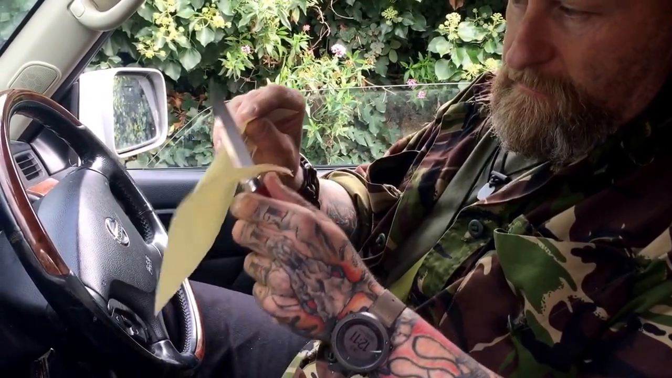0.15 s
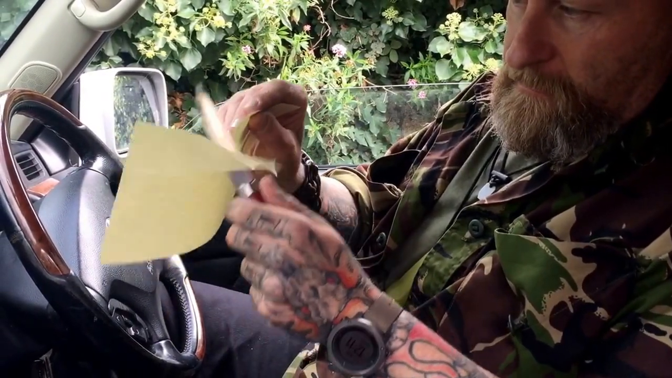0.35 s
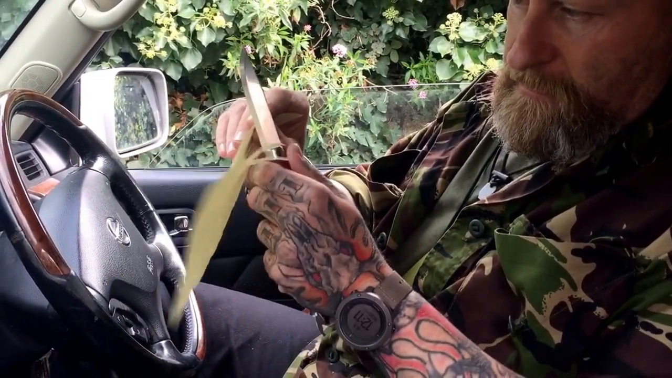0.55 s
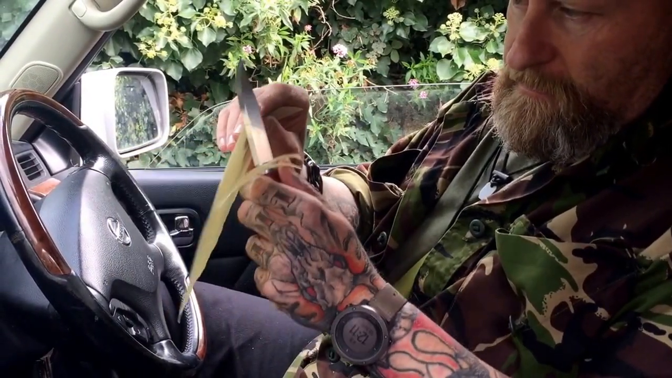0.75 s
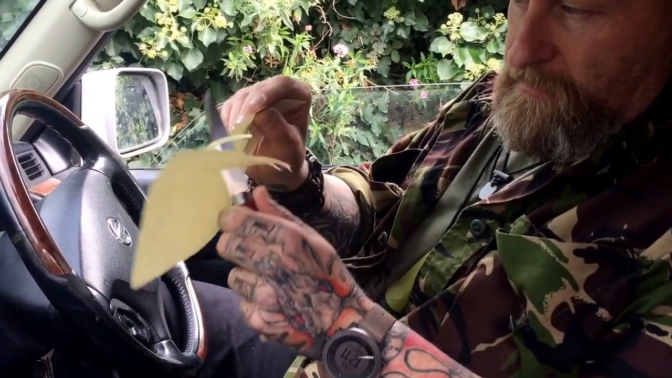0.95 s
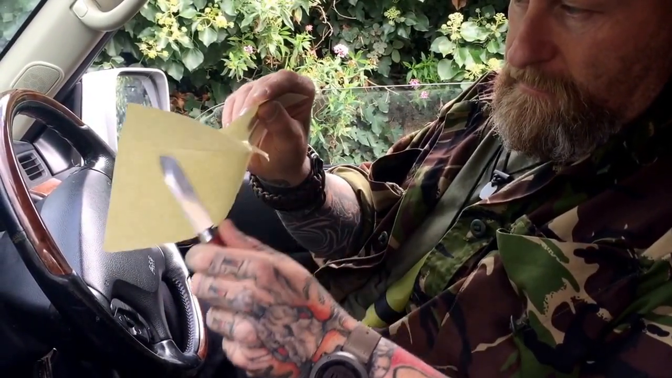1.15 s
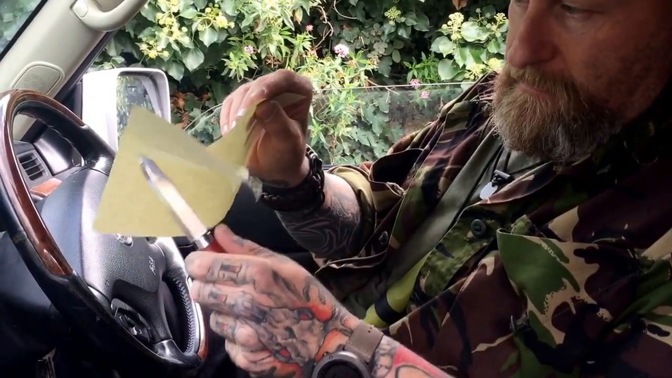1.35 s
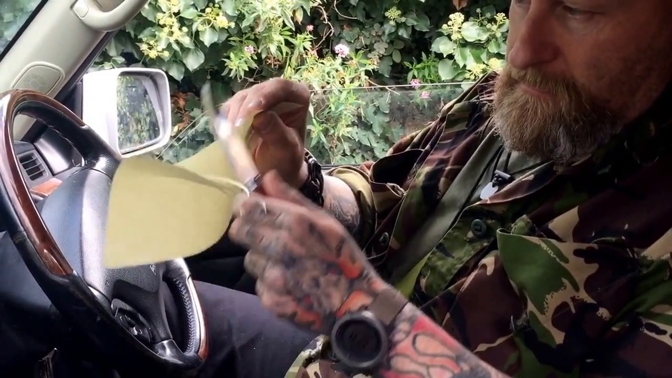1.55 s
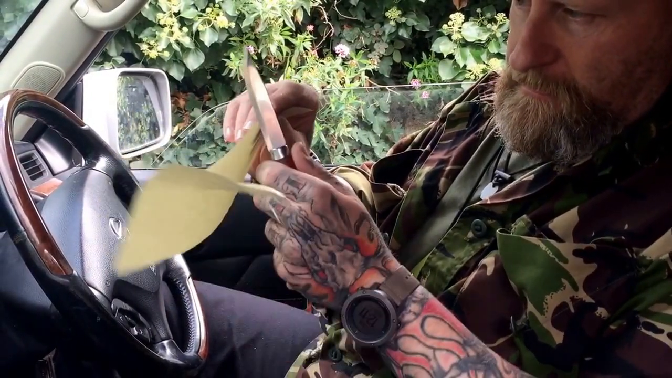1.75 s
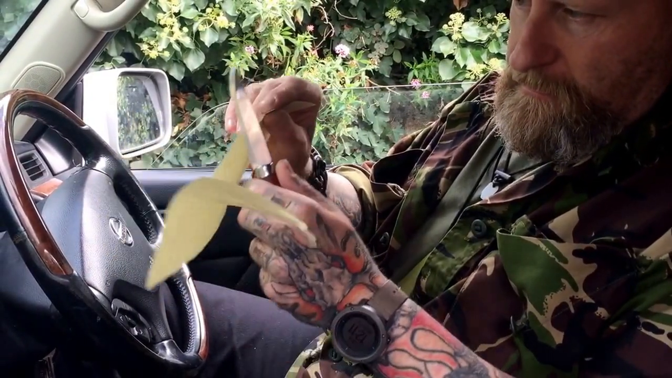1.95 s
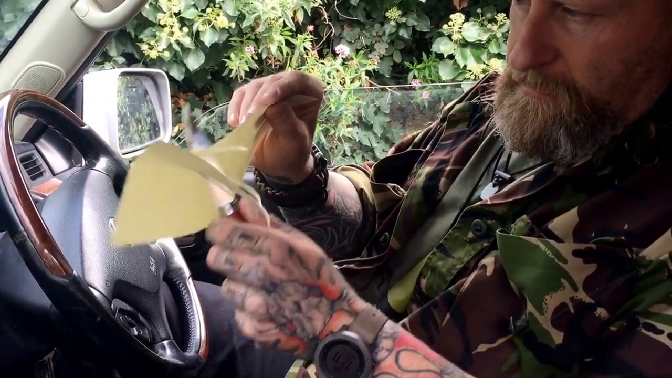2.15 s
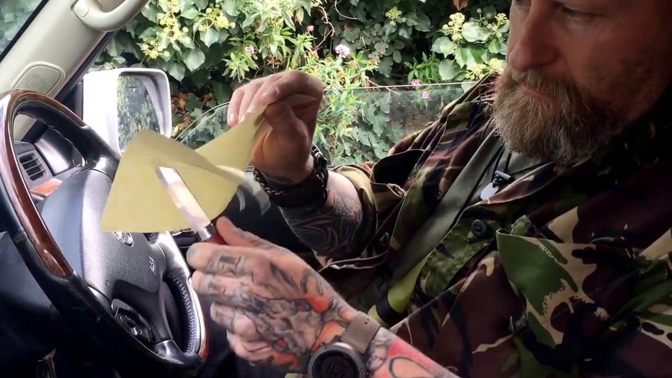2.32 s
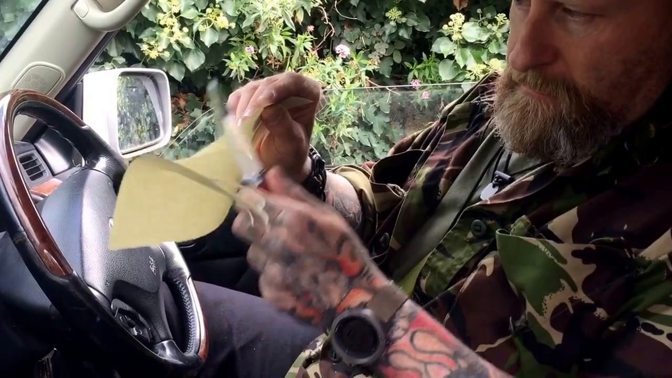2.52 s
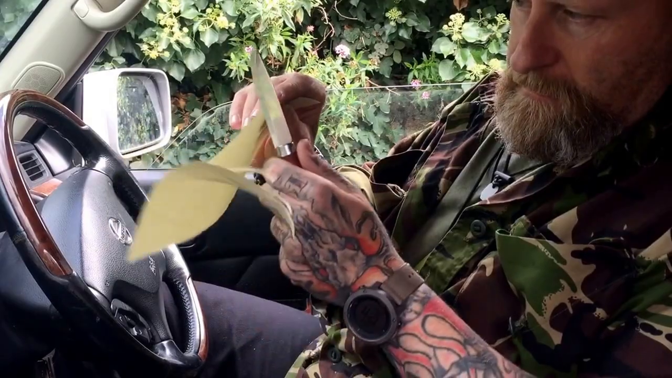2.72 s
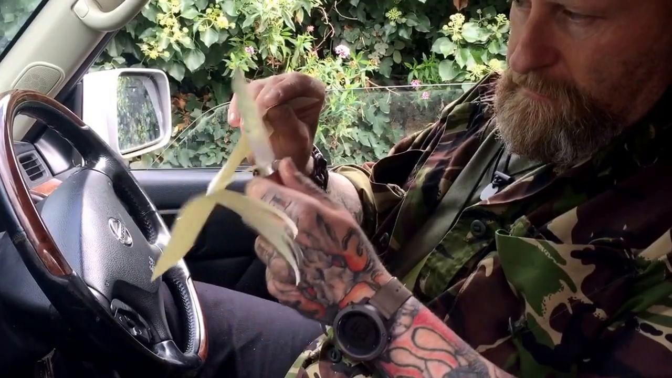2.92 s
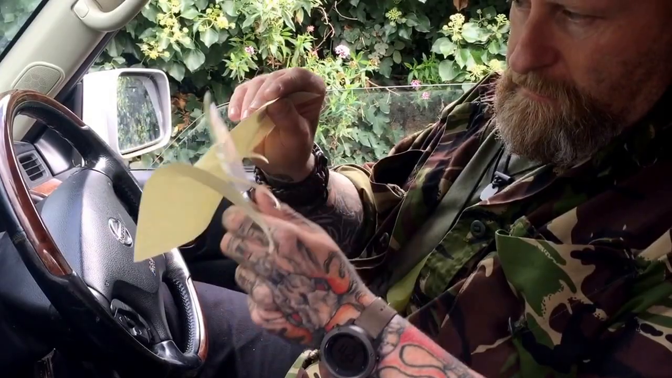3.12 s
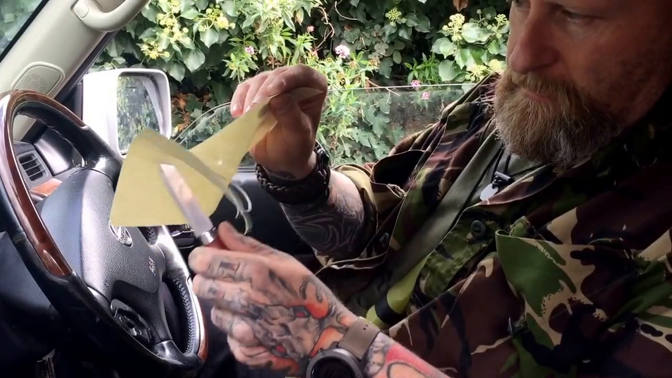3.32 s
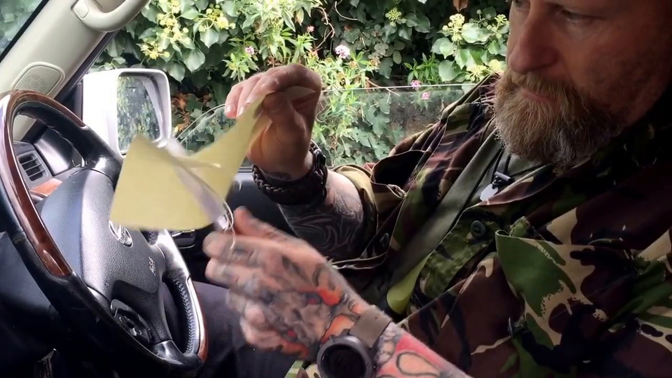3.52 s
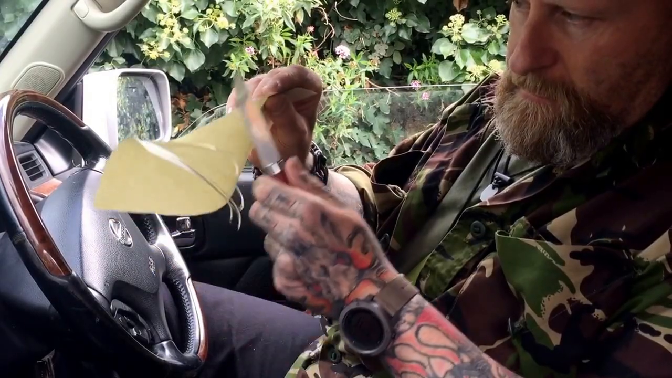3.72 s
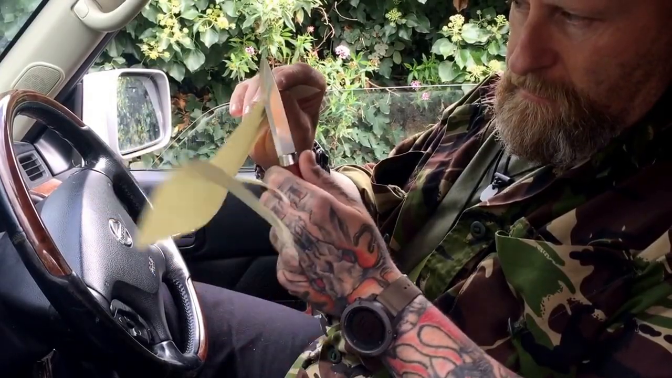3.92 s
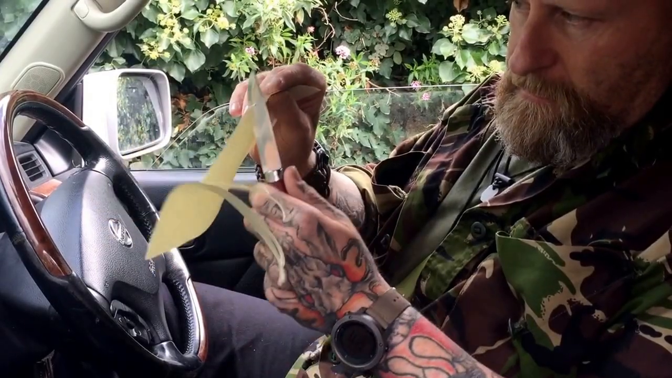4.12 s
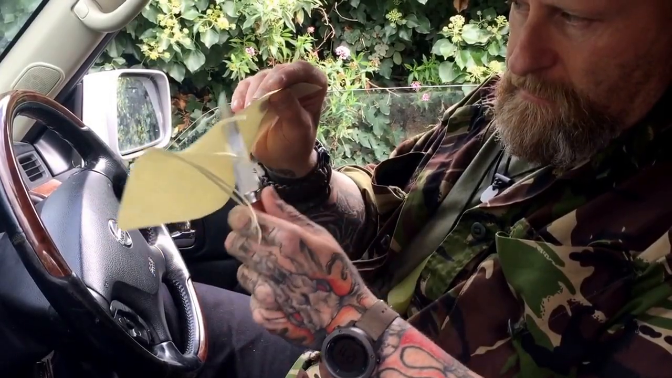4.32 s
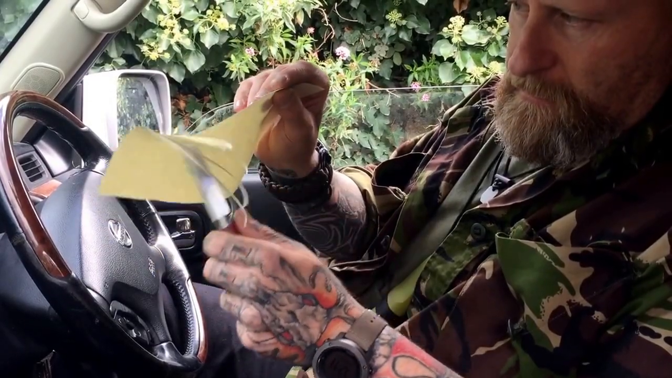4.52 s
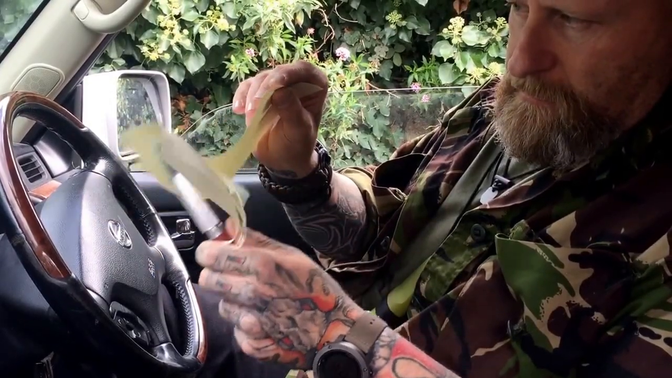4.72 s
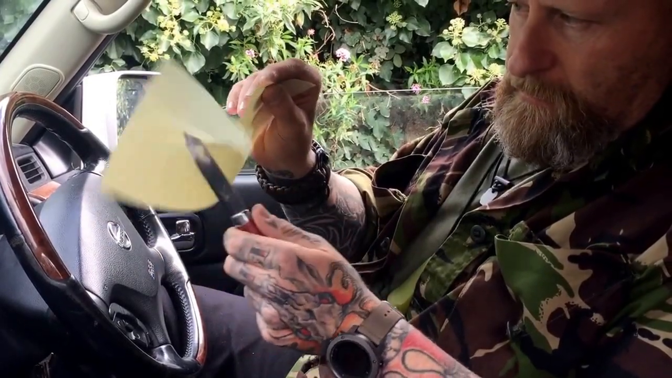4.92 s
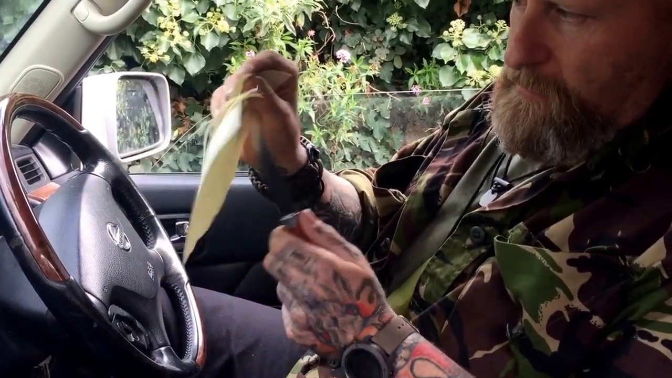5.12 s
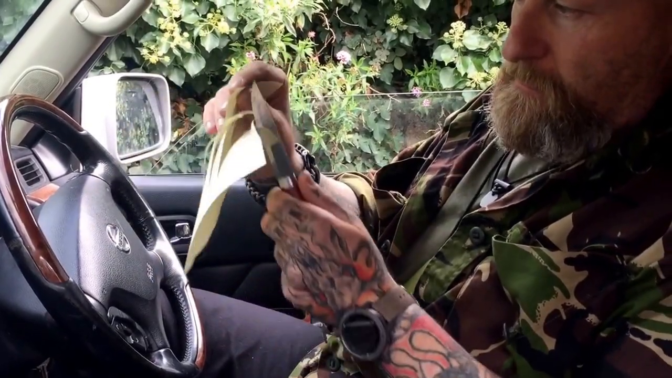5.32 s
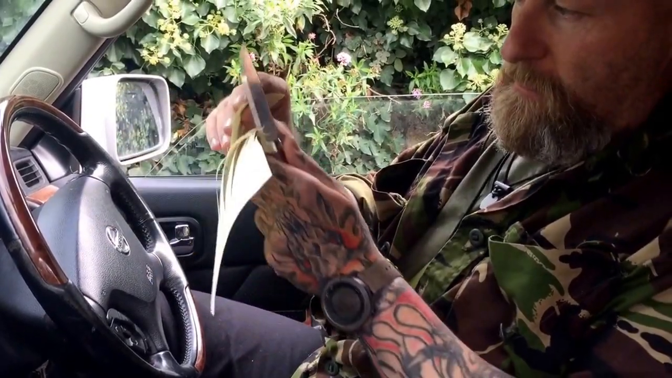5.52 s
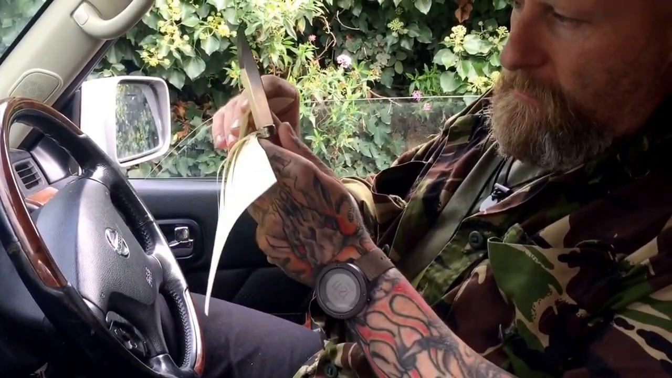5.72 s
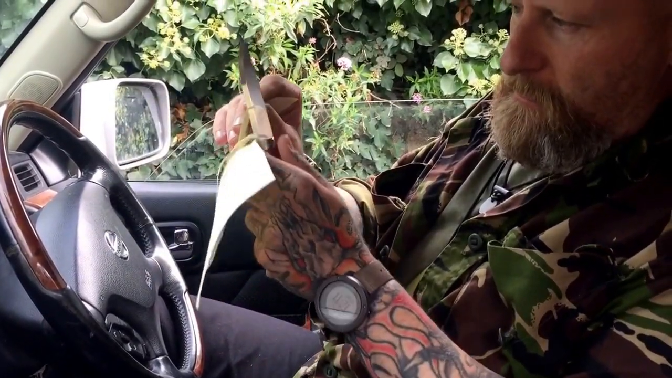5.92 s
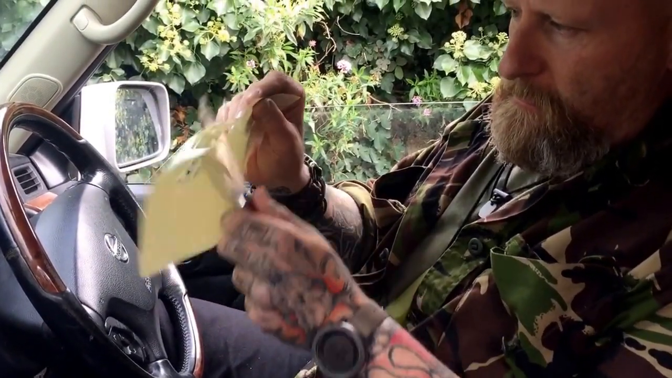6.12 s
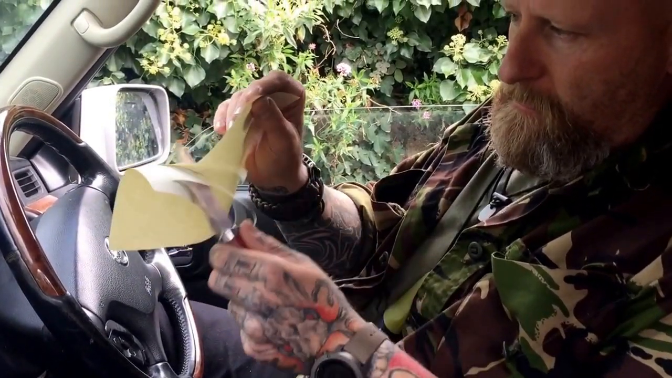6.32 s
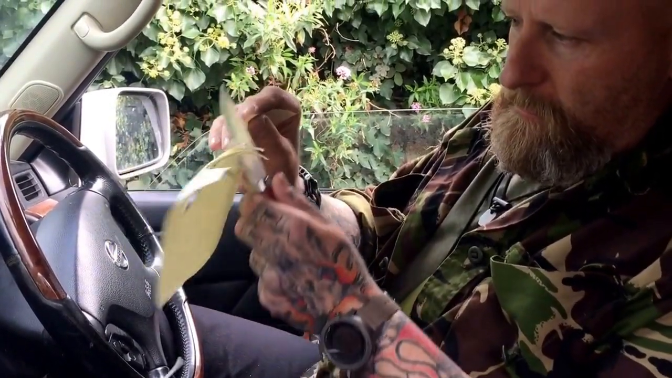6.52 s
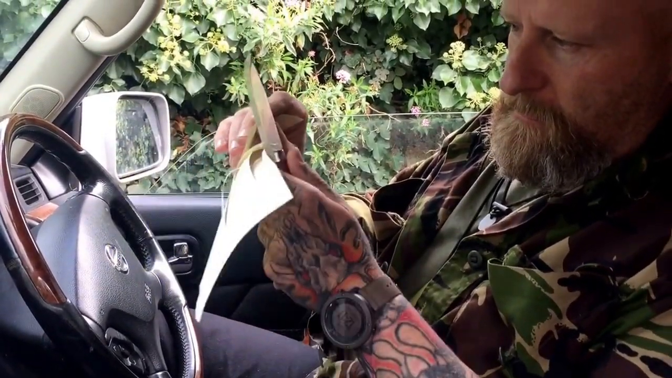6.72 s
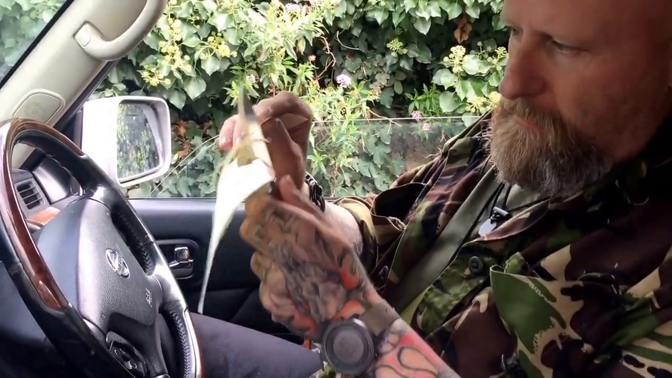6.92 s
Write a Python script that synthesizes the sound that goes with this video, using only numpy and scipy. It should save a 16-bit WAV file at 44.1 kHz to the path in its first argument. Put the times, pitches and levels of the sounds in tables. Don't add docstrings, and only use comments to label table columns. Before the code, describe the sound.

Close, dry sound of a keen blade cutting a loose paper sheet in a parked car. Four full strokes, each about half a second, swell from thin hiss to fuller papery rip, roughly a second apart. Small brushes, knocks and finger ticks fill the gaps; a long shallow nick and a faint one follow over a soft hush.

```python
import sys
import numpy as np
from scipy import signal
from scipy.fft import rfft, irfft
from scipy.io import wavfile
from scipy.ndimage import uniform_filter1d

SR = 44100
rng = np.random.default_rng(int(sys.argv[2]) if len(sys.argv) > 2 else 0)


def nominal_scale(level):
    x = np.asarray(level, float) / 20
    return 10 ** x


def transcribe(signal):
    frames = np.atleast_2d(signal).T
    limited = np.clip(frames, -1, 1)
    pcm = np.round(limited * 32767).astype(np.int16)
    wavfile.write(sys.argv[1], SR, pcm)


N = 306936


def cut():
    # [f/Hz, level/dB per Hz]
    rasp_spectrum = [(1100, -35.5), (1800, -25), (2700, 2), (4300, 3), (6000, -4.5), (8500, -3.5),
                     (11000, -39.5), (16000, -65)]
    flap_spectrum = [(350, -28), (600, -18), (794, -4), (980, 4.5), (1080, -2.5), (1530, 5.5), (1800, 8.5),
                     (3200, -6.5), (4160, -15), (7040, -120)]
    belly_spectrum = [(65, -48), (110, -32), (172, 5.5), (270, -11), (367, -1), (408, -7.5), (511, -0.5),
                      (608, -5), (800, -14), (1040, -4), (1760, -120)]
    fizz_spectrum = [(3530, -90), (6000, -4), (7200, -2.5), (9600, 1), (10400, -4.5), (11800, -1),
                     (15200, -7), (16200, -9), (16500, -60)]
    snaps = fibres()
    rasp = evened(shaped(snaps, rasp_spectrum))
    flap = evened(shaped(snaps, flap_spectrum))
    belly = evened(shaped(snaps, belly_spectrum))
    fizz = evened(shaped(snaps, fizz_spectrum))
    opened, note_hz = openings()
    note = resonate(rasp, note_hz, width_hz=600)
    rasp = evened(rasp + nominal_scale(4) * note)
    flap_low = colour(flap, lambda hz: 1 / (1 + (hz / 1350) ** 8))
    freed = np.clip(nominal_scale(26.5) * opened[2] / (opened[1] + 1e-9), 0.08, 1)
    flap = flap - (1 - freed) * flap_low
    return (opened * [rasp, flap, belly, fizz]).sum(0)


def fibres(per_s=9500, spread_db=2.3, chatter_db=0.9):
    snaps = rng.choice([-1., 1.], N) * (rng.random(N) < per_s / SR)
    snaps *= nominal_scale(spread_db * np.minimum(rng.exponential(1, N), 5))
    chatter = evened(uniform_filter1d(rng.standard_normal(N), size=260))
    return mottle(snaps * nominal_scale(chatter_db * chatter), depth_db=2.5, size=512, bins=2, frames=20)


def openings():
    flap_range_db, belly_range_db, belly_late = (-12.5, 3.5), (-45, -13), 1.67
    fizz_depth_db, fizz_knee_db, fizz_loss = 2, -38.5, 1
    note_wander, note_wander_s = 0.04, 0.052
    t = np.arange(N) / SR
    power = np.full((4, N), 1e-18)
    tuned = np.zeros(N)
    for rows, notes_hz, fizz_db, flap_db in contacts():
        s, press_db, depth = np.transpose(rows)
        on = slice(max(round(s[0] * SR), 0), max(round(s[-1] * SR), 0))
        press_db = np.interp(t[on], s, press_db)
        depth = np.clip(np.interp(t[on], s, depth), 0, 1.3)
        parts_db = [0 * depth,
                    flap_db + flap_range_db[0] + np.diff(flap_range_db) * depth,
                    flap_db + belly_range_db[0] + np.diff(belly_range_db) * depth ** belly_late,
                    fizz_db + fizz_depth_db * depth - fizz_loss * np.maximum(press_db - fizz_knee_db, 0)]
        power[:, on] += nominal_scale(press_db + parts_db) ** 2
        glide_hz = np.interp(t[on], np.linspace(s[0], s[-1], len(notes_hz)), notes_hz)
        tuned[on] += nominal_scale(press_db) ** 2 * glide_hz
    note_hz = (tuned / power[0]).clip(2500, 8000)
    note_hz = note_hz * (1 + note_wander * wander(note_wander_s))
    return uniform_filter1d(np.sqrt(power), size=130, axis=1), note_hz


def contacts():
    # [t/s, blade pressure level/dB, depth of the freed flap 0-1]
    cuts = [
        [(0.652, -70, 1), (0.682, -46, 0.37), (0.862, -47.5, 0.19), (0.97, -43, 0.48), (1.008, -39.5, 0.57),
         (1.074, -40.5, 0.84), (1.224, -39, 0.91), (1.3, -43, 0.93), (1.345, -71, .99)],
        [(1.79, -85, 1), (1.816, -59, .3), (1.874, -49, 0.7), (1.91, -48.5, 0.15), (2.142, -38, 0.45),
         (2.2, -39.5, 0.76), (2.33, -37, 0.81), (2.39, -88, 0.94)],
        [(2.915, -58, 0.6), (2.925, -41.5, 0.64), (2.991, -44, 0.51), (3.025, -43.5, 0.35),
         (3.187, -37.5, 0.31), (3.257, -36.5, 0.75), (3.319, -35.5, 0.81), (3.4, -37.5, 0.87), (3.45, -69, 1)],
        [(4.09, -62, 0.77), (4.126, -45.5, 0.4), (4.2, -49, 0.55), (4.246, -44, 0.43), (4.388, -35.5, 0.28),
         (4.48, -39, 0.79), (4.59, -40, 0.89), (4.656, -43, 0.91), (4.71, -77, .9)],
    ]
    nicks = [
        [(0.0, -46.5, 0.45), (0.064, -42, 0.01), (0.125, -46.5, 0.2), (0.145, -52.5, 0.5), (0.155, -60, 0)],
        [(5.845, -90, .2), (5.852, -60, 0), (5.976, -47.5, 0.1), (6.118, -43.5, 0.33), (6.17, -46.5, 0.62),
         (6.225, -61.5, 0.3), (6.245, -58.5, .5), (6.312, -65, 0.33), (6.33, -87, 0.5)],
        [(6.79, -76, 0), (6.81, -52.5, 0), (6.84, -51, 0.01), (6.902, -49, 0.2), (6.97, -47, 0.3)],
    ]
    # [start f/Hz, middle f/Hz, end f/Hz, fizz level/dB, flap level/dB]
    strips = [
        (4500, 4300, 4250, -0.5, -1.26),
        (4000, 4670, 3670, -1.5, -.3),
        (4300, 3870, 5900, -2.5, -0.6),
        (4100, 3620, 5900, -2.5, -0.2),
        (4500, 4600, 4800, -4.5, -9.5),
        (4300, 5000, 2400, 1.5, 1.5),
        (4600, 4900, 4200, 2.2, 2),
    ]
    # [start t/s, length t/s, first level/dB, last level/dB, strip note f/Hz]
    brushes = [(0.157, .095, -60.5, -63.5, 4000), (0.246, 0.016, -60, -43.5, 3700),
               (0.293, .05, -60, -71, 3960), (0.354, 0.019, -56, -84, 5200), (0.412, 0.021, -70, -70, 4000),
               (2.532, 0.067, -73, -65.5, 3600), (2.859, 0.046, -61, -53.5, 3530),
               (3.645, 0.14, -74, -70, 4500), (3.742, 0.051, -60.5, -56.5, 4640),
               (3.8, 0.06, -76, -68.5, 4300), (1.5, 0.035, -84, -66.5, 4000),
               (3.971, 0.037, -70, -62, 3700), (4.016, .012, -65, -49, 3800),
               (4.044, 0.046, -44.5, -62, 4150), (5.075, .045, -61, -74, 5250),
               (5.244, .012, -70, -64, 4200), (5.31, 0.35, -67.5, -71.5, 5040),
               (5.72, 0.018, -70, -80, 3850), (6.351, 0.056, -61.5, -80, 3520),
               (6.404, 0.083, -78, -69, 4600), (6.51, 0.039, -61, -78, 4000), (6.56, 0.19, -68, -76, 4100),
               (6.325, .025, -75, -77, 3500), (3.487, 0.087, -78, -86, 4000)]
    skids = [
        (1.608, 0.047, -36, -41.5, 4000),
        (2.762, 0.056, -60.5, -50, 3380),
        (4.753, 0.02, -51, -48, 4100),
        (4.794, 0.16, -59.5, -50, 5060),
    ]
    strokes = [(rows, notes_hz, fizz_db, flap_db)
               for rows, (*notes_hz, fizz_db, flap_db) in zip([*cuts, *nicks], strips)]
    slips = [(touch(*row, edges_s=(0.002, 0.016), depth=0.33), [hz], -3.5, 0) for *row, hz in brushes]
    false_starts = [(touch(*row, edges_s=(0.031, 0.031), depth=0.094), [hz], -1, 0) for *row, hz in skids]
    return strokes + slips + false_starts


def touch(start, length, first_db, last_db, edges_s, depth, edge_db=-28):
    end = start + length
    return [(start - edges_s[0], first_db + edge_db, depth),
            (start, first_db, depth),
            (end, last_db, depth),
            (end + edges_s[1], last_db + edge_db, depth)]


def taps():
    # [t/s, peak level/dB, colour f/Hz, thump level/dB, rattle t/s]
    knocks = [
        (0.259, -25.5, 2110, -28.5, 0.018),
        (1.868, -26, 2230, -21.5, 0.0016),
        (2.785, -38, 1950, -20, 0.027),
        (2.901, -21, 1830, -31.5, 0.0042),
        (3.465, -26.5, 1610, -33, 0.0046),
        (4.035, -26, 1700, -29.5, 0.0058),
        (6.616, -44.5, 1560, -45, 0.0078),
    ]
    slaps = [
        (4.74, -31, 1725, -19.5, 0.015),
        (6.147, -31.5, 1310, -20.5, 0.0042),
    ]
    # [t/s, peak level/dB, colour f/Hz, fizz level/dB]
    ticks = [(0.313, -38.5, 3700, -26), (0.355, -45.5, 2100, -33), (0.409, -49, 3420, -19),
             (1.594, -40, 3700, -10), (2.533, -54, 7160, -13), (2.583, -46.5, 2900, -22),
             (2.764, -41.5, 2400, -21), (1.535, -57, 4000, -10), (2.871, -59, 3680, -6),
             (3.602, -53.5, 2170, -25), (3.661, -46, 4280, -10), (3.711, -47, 4300, -11),
             (3.754, -36, 4300, -8), (4.115, -34, 3550, -2), (4.715, -41, 3330, -28),
             (4.803, -44.5, 1700, -21), (5.024, -50, 6400, -12), (5.076, -45, 7700, -16),
             (5.257, -39, 4140, -40), (5.322, -46.5, 4100, -7), (5.721, -56, 3360, -21),
             (6.237, -34.5, 3230, -8.5), (6.349, -62, 3800, -22), (6.497, -37, 2330, -7),
             (6.298, -36, 3030, -21)]
    knock_thump_hz, slap_thump_hz, knock_fizz_db = 456, 192, -20.5
    tick_thump_db, tick_rattle_s = -33.5, 0.0079
    rows = [(s, db, hz, thump_db, knock_thump_hz, knock_fizz_db, rattle_s)
            for s, db, hz, thump_db, rattle_s in knocks]
    rows += [(s, db, hz, thump_db, slap_thump_hz, knock_fizz_db, rattle_s)
             for s, db, hz, thump_db, rattle_s in slaps]
    rows += [(s, db, hz, tick_thump_db, slap_thump_hz, fizz_db, tick_rattle_s)
             for s, db, hz, fizz_db in ticks]
    out = np.zeros(N + 4096)
    for s, *how in rows:
        out[round(s * SR):][:4096] += tap(*how, rng.standard_normal(2048))
    return out[:N]


def tap(db, hz, thump_db, thump_hz, fizz_db, rattle_s, noise):
    t = np.arange(len(noise)) / SR
    burst = noise * np.exp(-t / max(rattle_s, 0.0005)) * (1 - np.exp(-t / 0.00076))
    burst[8] += 2.6
    f = np.fft.rfftfreq(4096, 1 / SR)
    notes = nominal_scale(6) * (ring(f, hz, 11) - 0.6 * ring(f, 1.85 * hz, 11))
    body = nominal_scale(4) * ring(f, 0.94 * hz, 0.58) ** 2
    thump = nominal_scale(thump_db + 25.5) * ring(f, thump_hz, 1.26)
    fizz = nominal_scale(fizz_db + 16.5) * ring(f, 6720, 4.3) ** 2
    sound = irfft(rfft(burst, 4096) * (notes + body + thump + fizz))
    return nominal_scale(db - 2) * sound / abs(sound).max()


def cabin(x, modes_db=8, tail_db=-5):
    # [f/Hz, width f/Hz, level/dB]
    standing_waves = [(199, 72, -28), (510, 190, -2), (870, 23, -7), (1128, 53, -2), (1343, 91, -5),
                      (1540, 73, -2), (1700, 56, -4.5), (2184, 17, -9), (2480, 110, -8.5), (2746, 18, -15),
                      (3146, 33, -12), (4180, 19, -8.5), (3664, 36, -10), (5645, 26, 3), (6197, 300, -5.5),
                      (6680, 58, -2), (7290, 320, -10), (2320, 14, -6), (8040, 71, -8), (8950, 30, -10.5)]
    # [f/Hz, t60 t/s]
    decay = [(150, 0.086), (1000, 0.063), (4000, 0.03), (12000, 0.025)]
    t = np.arange(8192) / SR
    modes = 0
    for hz, width, db in standing_waves:
        strength = nominal_scale(1.07 * db) * 2 * np.pi * width / SR
        modes = modes + strength * np.exp(-np.pi * width * t) * np.sin(2 * np.pi * hz * t)
    late = t > 0.002
    hz, frames, z = signal.stft(rng.standard_normal((2, 8192)) * late, SR, nperseg=256)
    fade = nominal_scale(-60 * frames / read(decay, hz)[:, None])
    tails = signal.istft(z * fade, SR, nperseg=256)[1][:, :8192] * late
    tails = tails / np.linalg.norm(tails[0])
    turn = 2 * np.pi * 1.3 * np.arange(N) / SR
    diffuse = signal.oaconvolve(x * [np.cos(turn), np.sin(turn)], tails, axes=1).sum(0)
    near = (t == 0) + nominal_scale(modes_db) * modes
    wet = (signal.oaconvolve(x, near) + nominal_scale(tail_db) * diffuse[:N + 8191])[:N]
    return wet / np.hypot(np.linalg.norm(near), nominal_scale(tail_db))


def hush(air_db=-67.5, rumble_db=-71, swell_db=3.5, swell_s=0.11):
    # [f/Hz, level/dB per Hz]
    air_spectrum = [(53, -73), (90, -5), (676, -17), (753, -18.5), (956, -13), (1070, -15.5), (1720, -15.5),
                    (2040, -20.5), (2710, -20), (16000, -31)]
    air = shaped(rng.standard_normal(N), air_spectrum)
    air = colour(air, lambda hz: abs(1 - 0.5 * ring(hz, 10700, 13)))
    air = evened(mottle(air, depth_db=0.5, size=1024, bins=120, frames=24))
    rumble = colour(rng.standard_normal(N),
                    lambda hz: abs(ring(hz, 53.2, 2.2) ** 2 + 0.5 * ring(hz, 76.5, 4.8) ** 2))
    swell = nominal_scale(rumble_db + swell_db * wander(swell_s))
    return nominal_scale(air_db) * air + swell * evened(rumble)


def evened(x):
    return x / np.sqrt(np.mean(abs(x) ** 2) + 1e-20)


def read(points, hz):
    f, value = np.transpose(points)
    return np.interp(np.log(hz + 1), np.log(f + 1), value)


def colour(x, gain):
    return irfft(rfft(x) * gain(np.fft.rfftfreq(len(x), 1 / SR)), len(x))


def shaped(x, spectrum):
    return colour(x, lambda hz: nominal_scale(read(spectrum, hz)))


def mottle(x, depth_db, size, bins, frames):
    z = signal.stft(x, nperseg=size, noverlap=size * 3 // 4)[2]
    patches = uniform_filter1d(rng.standard_normal(z.shape), bins, axis=0)
    patches = evened(uniform_filter1d(patches, frames, axis=1))
    return signal.istft(z * nominal_scale(depth_db * patches), nperseg=size, noverlap=size * 3 // 4)[1][:N]


def ring(hz, at_hz, sharp):
    return 1 / (1 + 1j * sharp * (hz / at_hz - at_hz / (hz + 1)))


def resonate(x, hz, width_hz):
    turn = np.exp(2j * np.pi * np.cumsum(hz) / SR)
    r = np.exp(-np.pi * width_hz / SR)
    return 2 * (turn * signal.lfilter([1 - r], [1, -r], x / turn)).real


def wander(span_s):
    step = max(round(span_s * SR), 2)
    return evened(uniform_filter1d(uniform_filter1d(rng.standard_normal(N), step), step))


def scene():
    mono = cabin(cut() + taps()) + hush()
    return np.array([mono, mono])


def roll_off(x):
    return signal.sosfilt(signal.butter(12, 16990, fs=SR, output="sos"), x)


def record(dry):
    band_limit = signal.firwin(511, 15830, window=("kaiser", 9), fs=SR)
    limited = signal.oaconvolve(dry, band_limit[None], "same")
    return roll_off(limited)


dry = scene()
out = record(dry)
transcribe(out)
```